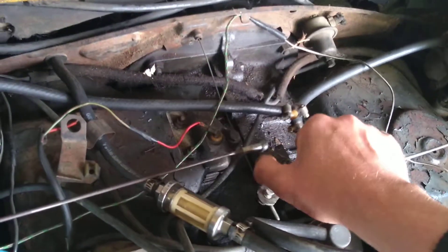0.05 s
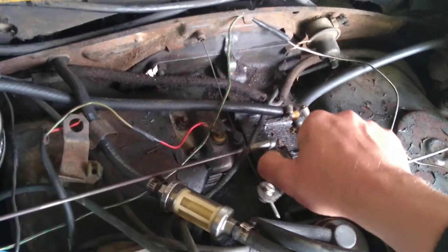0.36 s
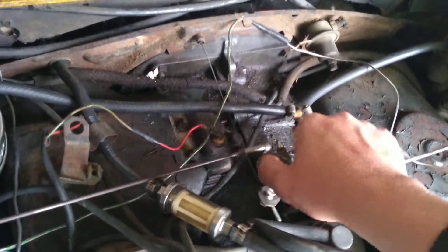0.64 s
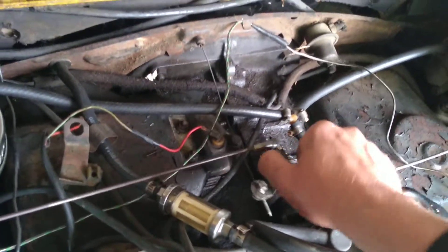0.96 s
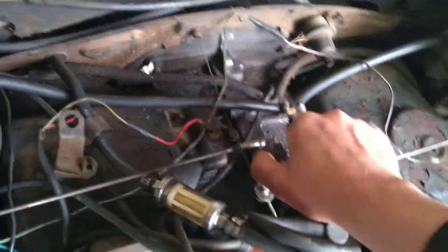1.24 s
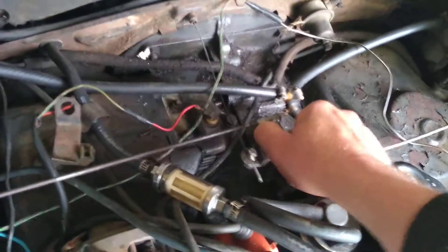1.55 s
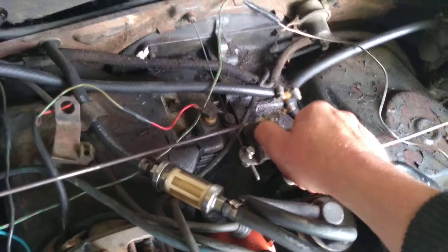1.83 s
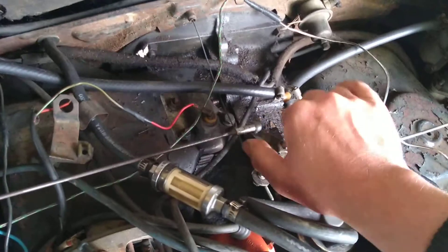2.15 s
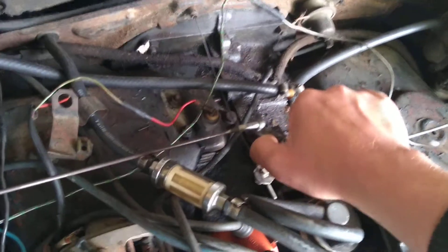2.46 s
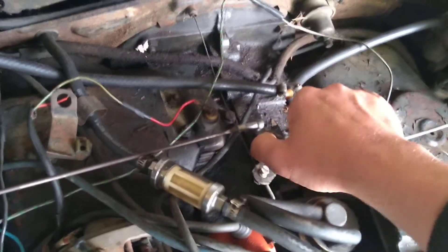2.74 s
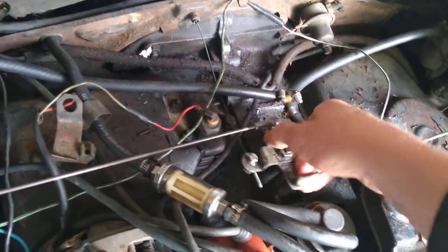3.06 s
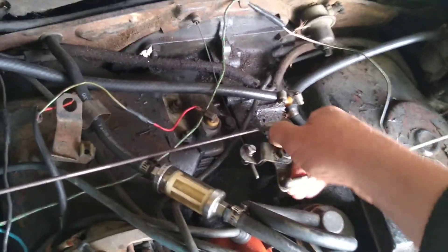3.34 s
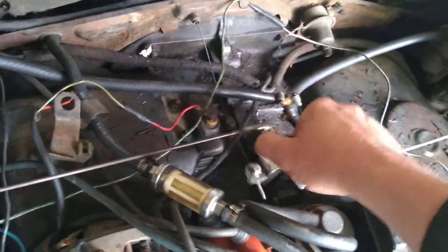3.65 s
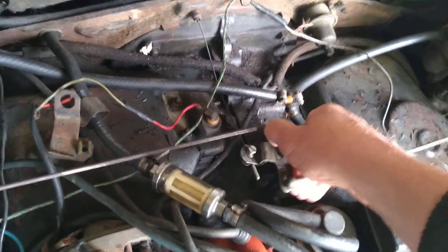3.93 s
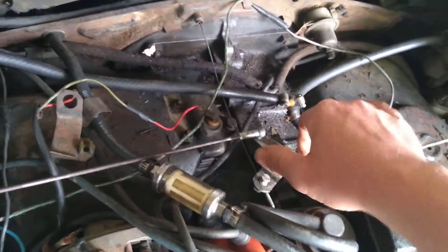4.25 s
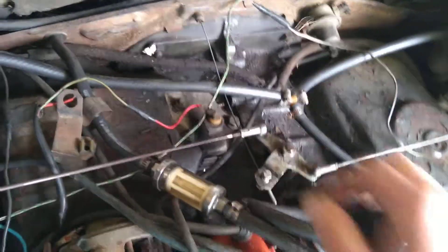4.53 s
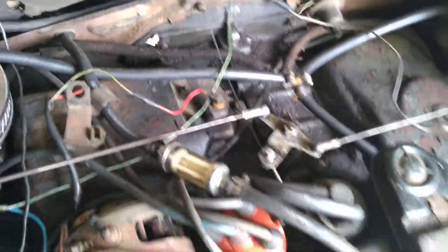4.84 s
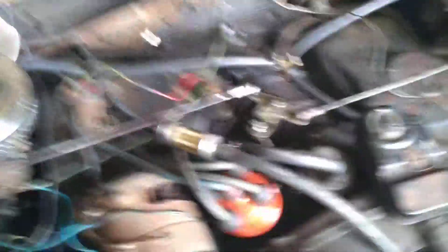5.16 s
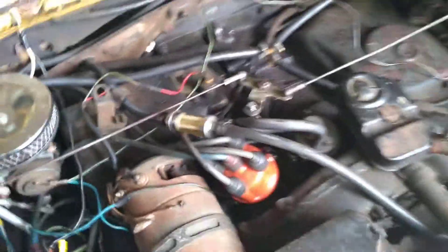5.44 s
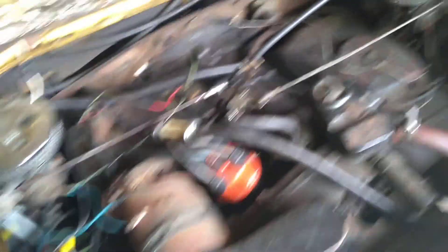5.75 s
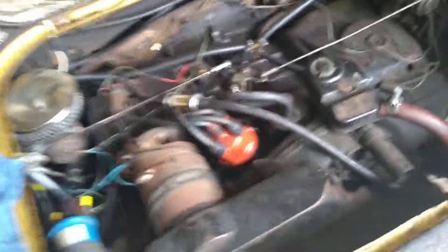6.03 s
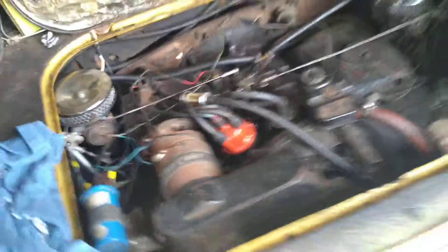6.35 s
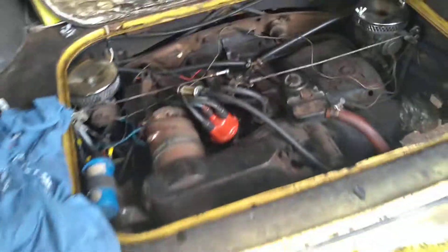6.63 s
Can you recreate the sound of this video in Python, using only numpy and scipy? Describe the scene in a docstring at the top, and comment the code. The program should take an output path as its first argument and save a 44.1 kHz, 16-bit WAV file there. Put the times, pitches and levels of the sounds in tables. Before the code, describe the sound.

An air-cooled four-cylinder car engine is already running, heard in stereo close above its open bay, with booming exhaust, clattering metal covers and rushing air. Short throttle blips come at the start, at 0.5 seconds and at 1 second, each with a hard intake bark. A longer rev climbs from 1.5 to 2.1 seconds and falls back. From about 3 seconds, three quick pulls step up to the highest, howling rev at 4.2 seconds. The throttle linkage clinks faintly now and then. The throttle shuts and the engine coasts down with a falling drone, giving a dull exhaust pop near 5 seconds. From there one cylinder knocks with a short metallic rattle, repeating and gradually slowing. From about 5.7 seconds dry, uneven valve clacks grow clearer as the engine sinks toward a slow, thumping, ticking idle, still running at about 7 seconds.

```python
"""Revving an air-cooled engine

A four-cylinder engine is revved by hand, heard by two spaced microphones above its open bay.
Each blip (a quick pull on the throttle) lets air into the intakes with a hard bark. The engine then
coasts down over its booming exhaust and clattering metal, and sinks to a slow, ticking idle
in which one cylinder knocks once a cycle."""
import sys
import numpy as np
from scipy import signal
from scipy.fft import rfft, irfft, next_fast_len
from scipy.io import wavfile
from scipy.ndimage import uniform_filter1d

SR = 44100
rng = np.random.default_rng(int(sys.argv[2]) if len(sys.argv) > 2 else 0)


def generate_wav(signal):
    """Clip the signal to [-1, 1] and save it as 16-bit WAV at the path in sys.argv[1]."""
    frames = np.transpose(np.atleast_2d(signal))
    scaled = np.clip(frames, -1, 1) * 32767
    pcm = np.round(scaled).astype(np.int16)
    wavfile.write(sys.argv[1], SR, pcm)


N = 303868
T = np.arange(N) / SR
CRUISE_HZ = 75  # engine speed is counted in firings per second, two per turn of the crank

# pulls on the throttle: open_s, shut_s, start_speed_hz, top_speed_hz, bark_db, gasp_db, attack_s, release_s
BLIPS = [(-0.1, 0.06, 68.7, 73.26, -20.5, 10, 0.048, 0.058),
         (0.466, 0.758, 49.4, 73.3, -16.5, 6.5, 0.13, 0.1),
         (0.95, 1.119, 60.81, 75.95, -20.5, 10.5, 0.048, 0.059),
         (1.54, 2.12, 51.27, 106.8, -18, 6, 0.065, 0.064),
         (2.95, 3.135, 51.93, 67.39, -15.5, -3.5, 0.024, 0.027),
         (3.21, 3.549, 68.09, 111.7, -17.5, 3, 0.023, 0.049),
         (3.76, 4.18, 98.94, 148.1, -18.5, 2.5, 0.032, 0.045)]
# blows of the knocking cylinder, led by the sharp crack of the exhaust pop: start_s, level_db
KNOCKS = [(4.946, -11.5), (5.274, -11), (5.401, -12), (5.471, -12), (5.547, -7.5), (5.627, -9),
          (5.71, -9.5), (5.798, -8), (5.889, -7), (5.986, -8), (6.087, -7), (6.193, -6.5), (6.302, -9),
          (6.416, -8.5), (6.534, -10), (6.654, -9), (6.778, -8)]
# the cylinders in firing order: boom_db, bark_db, clatter_db, hiss_db, tick_db
CYLINDERS = [(0, 0, -5, -3, 8), (0, 1.5, -6.5, -3.5, 5.5), (1.5, -1, -5, -2, 11.5), (2.5, 0.5, -6.5, -3, 8)]
# the mix as the microphones draw back: time_s, left_minus_right_db, shaking_db, tick_db, hiss_db
MIC_VIEW = [(0, -1.5, -33.5, -44, -41), (1.5, -1.5, -32.5, -47.5, -40), (2.3, -1.5, -30, -43, -37.5),
            (2.7, -1.5, -30, -45, -36.5), (4.3, -2.5, -28.5, -35, -36.5), (5.0, 0, -28.5, -40, -34.5),
            (5.7, 3.5, -26, -39.5, -42.5), (6.3, 1, -25.5, -32, -45), (6.89, -0.5, -26.5, -25.5, -49)]
# tone of small metal parts: pitch_hz, level_db
TINKLE_SPECTRUM = [(1500, -23), (4000, -16), (7000, -1), (10000, -4.5), (13500, -3), (14500, 9)]


def amp(db):
    """Turns decibels into a gain."""
    return 10 ** (np.asarray(db) / 20)


def unit_level(x):
    """Scales a signal to an average power of one."""
    return x / np.sqrt(np.mean(x ** 2) + 1e-20)


def mic_view(column):
    """One column of MIC_VIEW, at every sample."""
    rows = np.array(MIC_VIEW, float)
    return np.interp(T, rows[:, 0], rows[:, column])


def level_at(spectrum, hz):
    """Looks up a spectrum's decibels at any pitch."""
    pitches, levels = np.transpose(spectrum)
    return np.interp(np.log(hz + 1), np.log(pitches + 1), levels)


def wander(per_s):
    """A smooth random wobble of size about one."""
    points = rng.standard_normal(int(N / SR * per_s) + 2)
    fine = signal.resample(points, 8 * len(points))
    return unit_level(np.interp(T, np.linspace(0, T[-1], len(fine)), fine))


def colour(x, spectrum, size=4096):
    """Gives a sound a spectrum, with a filter that rings only after each hit."""
    log_gain = np.log(amp(level_at(spectrum, abs(np.fft.fftfreq(size, 1 / SR)))))
    taps = np.fft.ifft(np.exp(np.conj(signal.hilbert(log_gain)))).real
    return signal.oaconvolve(x, taps[None], axes=1)[:, :N]


def add(mix, start_s, sound):
    """Lays a sound into the mix at a given time."""
    part = mix[round(start_s * SR):][:len(sound)]
    part += sound[:len(part)]


def bursts(rows, rise_s, decay_s):
    """A loudness curve of quick bursts, from rows of start_s, level_db."""
    ages = ((np.maximum(T - start_s, 0), db) for start_s, db in rows)
    return sum(amp(db) * (1 - np.exp(-age / rise_s)) * np.exp(-age / decay_s) for age, db in ages)


def engine_bay(x, echo_s, echo_db, size=8192):
    """Adds dense echoes that fall 60 dB in echo_s; the two microphones hear the treble least alike."""
    # sound scattered differently to each microphone: pitch_hz, level_db
    scatter_spectrum = [(50, -2), (130, -4), (300, -3.5), (550, -8), (1100, 4), (3000, 15), (14000, 18.5)]
    t, hz = np.arange(size) / SR, np.fft.rfftfreq(size, 1 / SR)
    tails = rng.standard_normal((3, size)) * amp(-60 * t / echo_s)
    tails = rfft(tails / np.linalg.norm(tails, axis=1, keepdims=True))
    shared = (1 + amp(echo_db) * tails[0]) / np.hypot(1, amp(echo_db))
    scatter = amp(level_at(scatter_spectrum, hz))
    paths = irfft((shared + scatter * tails[1:]) / np.hypot(1, scatter))
    return signal.oaconvolve(x[None], paths[:, :size // 2], axes=1)[:, :N]


def bay_noise(spectrum, echo_s, echo_db):
    """Steady noise with a given spectrum, echoing in the bay."""
    return unit_level(colour(engine_bay(rng.standard_normal(N), echo_s, echo_db), spectrum))


def engine_speed(idle_hz=28.7, drag_hz_per_s=90.7, drag_range_hz=56.3, sag_hz=2.6, ease=.023):
    """Firings per second: climbs with each blip, coasts between them, and at last settles toward idle."""
    blips = np.array(BLIPS)
    speed = np.interp(T, blips[:, :2].ravel(), blips[:, 2:4].ravel())
    for open_s, shut_s, start_hz, top_hz, *_ in BLIPS:
        progress = np.clip((T - open_s) / (shut_s - open_s), 0, 1)
        speed -= ease * (top_hz - start_hz) * np.sin(2 * np.pi * progress)
    # after the last blip the speed sags, then falls under a drag that fades near idle
    _, shut_s, _, top_hz, *_ = BLIPS[-1]
    fade = np.exp(-(T - shut_s) * drag_hz_per_s / drag_range_hz)
    excess = np.sinh((top_hz - sag_hz - idle_hz) / drag_range_hz)
    return np.where(T > shut_s, idle_hz + drag_range_hz * np.arcsinh(excess * fade), speed)


def firing_count():
    """Firings so far, nudged so that every knock falls on the first cylinder."""
    count = np.cumsum(engine_speed()) / SR
    knock_s = np.array(KNOCKS)[:, 0]
    nudge = np.unwrap(-np.interp(knock_s, T, count), period=len(CYLINDERS))
    return count + np.interp(T, knock_s, nudge)


def revs():
    """Octaves (doublings) of engine speed above cruising."""
    return np.log2(engine_speed() / CRUISE_HZ)


def idling():
    """How far the engine has sunk into slow, separate beats, 0-1."""
    return np.clip(-revs(), 0, 1)


def opening(open_s, shut_s, attack_s, release_s, lead_s=0.015, run_on_s=0.028):
    """The throttle plate in one blip, 0-1: it opens just before the speed climbs and shuts just after."""
    return np.clip(np.minimum((T - open_s + lead_s) / attack_s, (shut_s + run_on_s - T) / release_s), 0, 1)


def airflow(gasp_share=1, gasp_s=0.086, db_per_octave=3.5):
    """Strength of the intake sound: zero with the throttle shut, most often with a gasp as it opens."""
    flow = 0
    for open_s, shut_s, _, _, bark_db, gasp_db, attack_s, release_s in BLIPS:
        gasp = gasp_share * np.exp(-abs(T - open_s) / gasp_s)
        flow += opening(open_s, shut_s, attack_s, release_s) * amp(bark_db + gasp * gasp_db)
    return flow * amp(db_per_octave * revs())


def load(switch_s=0.043):
    """How hard the engine pulls, 0-1: any blip soon puts it under load."""
    return sum(opening(open_s, shut_s, switch_s, switch_s) for open_s, shut_s, *_ in BLIPS)


def starved(lasts_s=0.31):
    """How starved the cylinders are just after the throttle snaps shut, 0-1."""
    just_shut = sum((T > shut_s) * np.exp(-((T - shut_s) / lasts_s) ** 4) for _, shut_s, *_ in BLIPS)
    return np.minimum(just_shut, 1) * (1 - load()) * np.clip(.5 + revs(), 0, 1)


def shaking_db(db_per_octave=5):
    """Level of the engine's vibration, which grows with speed."""
    return mic_view(2) + db_per_octave * revs()


def strokes(count, cylinder_db, noise_share, rise_s, decay_s, fill, uneven_db, echo_s, echo_db):
    """Each firing gives a sharp pulse and a dying puff of noise; each cylinder has its own echoes."""
    firing = np.floor(count).astype(int)
    cylinder = firing % len(CYLINDERS)
    firing -= firing.min()
    speed = engine_speed()
    age = count % 1 / speed
    strength = amp(cylinder_db[cylinder] + uneven_db * rng.standard_normal(N)[firing])
    pulse = unit_level(np.diff(firing, prepend=firing[0]) / np.sqrt(speed))
    # the faster the engine, the more the gaps between firings fill in
    puff = fill * (speed / CRUISE_HZ) ** 0.18 + (1 - np.exp(-age / rise_s)) * np.exp(-age / decay_s)
    puff /= np.sqrt(uniform_filter1d(puff ** 2, size=4096))
    noise = puff * rng.standard_normal(N)
    noise_share = np.clip(noise_share, 0, 1)
    blows = strength * (np.sqrt(1 - noise_share) * pulse + np.sqrt(noise_share) * noise)
    return sum(engine_bay(blows * (cylinder == k), echo_s, echo_db) for k in range(len(CYLINDERS)))


def engine_tones(count, tones, resonances, waver, left_lag_rad, sway_rad, flutter_db):
    """Tones at multiples of the firing rate sweep through fixed resonances, each fluttering on its own."""
    speed, out, power = engine_speed(), 0, 0
    count = count + waver * wander(40)
    for multiple, db in tones:
        height = amp(db + level_at(resonances, multiple * speed))
        phase = 2 * np.pi * (multiple * count + rng.random())
        flutter = amp(flutter_db * wander(70))
        left_phase = phase - left_lag_rad - sway_rad * wander(6)
        out += height * flutter * np.cos([left_phase, phase])
        power += height ** 2 / 2
    return out / np.sqrt(power)


def cooling_fan(level_db=-44, db_per_octave=5):
    """The fan's even rush grows louder with speed."""
    # tone of the fan's air: pitch_hz, level_db
    spectrum = [(500, -13), (1400, 24), (2000, -14), (3500, 6), (7000, 10.5), (10000, -4), (14500, -8)]
    return unit_level(colour(rng.standard_normal((2, N)), spectrum)) * amp(level_db + db_per_octave * revs())


def loose_metal(count, ticks_per_s=45, level_db=-44, db_per_octave=-2):
    """Loose clips and rods tick at random just after a firing jolts them, loudest at idle."""
    chance = 5 * (1 - count % 1) ** 4 * ticks_per_s / SR
    ticks = engine_bay((rng.random(N) < chance).astype(float), echo_s=0.032, echo_db=10)
    return unit_level(colour(ticks, TINKLE_SPECTRUM)) * amp(level_db + db_per_octave * revs())


def linkage_clinks():
    """The slack throttle linkage clinks as it is pulled, or as the engine shakes it."""
    # bright clinks: start_s, level_db
    clinks = [(1.547, -25), (2.991, -27), (3.21, -19), (5.198, -27), (5.323, -27), (5.712, -25),
              (6.55, -28)]
    return bursts(clinks, rise_s=0.0003, decay_s=0.0022) * bay_noise(TINKLE_SPECTRUM, echo_s=0.015, echo_db=0)


def air_hiss(count, waver_db=0.64):
    """Air rushes past the throttle plates and cooling fins, surging with each stroke."""
    # tone of the rushing air: pitch_hz, level_db
    spectrum = [(400, -34), (1500, -20), (2400, -6.5), (3000, 8.5), (3700, 7), (4700, 6.5), (5400, 2.5),
                (6700, 4.5), (9000, -1.5), (12000, -2.5), (14500, -34)]
    # brief rasps of air rushing in: start_s, level_db
    rasps = [(0.497, -27), (0.65, -39), (1.58, -26), (1.88, -30), (3.238, -25)]
    surges = strokes(count - .1, np.array(CYLINDERS)[:, 3], noise_share=0.88, rise_s=0.0016,
                     decay_s=0.012, fill=0.36, uneven_db=2.5, echo_s=0.065, echo_db=-13)
    background = amp(mic_view(4) - 1.5 * revs())
    inrush = amp(-17 + 2.5 * revs()) * airflow(gasp_share=.75) + bursts(rasps, rise_s=.002, decay_s=0.014)
    return unit_level(colour(surges, spectrum)) * np.hypot(background, inrush) * amp(waver_db * wander(33))


def valve_ticks(count, db_per_octave=5):
    """Tappets, the parts that push the valves open, click against their rockers, harder with speed."""
    # tone of a click: pitch_hz, level_db
    spectrum = [(300, -54), (1150, -21.5), (1500, 17), (1950, 13.5), (2400, 20.5), (3000, 12), (3550, 8.5),
                (4100, 14.5), (4700, 0), (5500, 10), (9000, -6), (14500, -41)]
    clicks = strokes(count, np.array(CYLINDERS)[:, 4], noise_share=0.94, rise_s=0.0015,
                     decay_s=0.0037, fill=0.022, uneven_db=1.5, echo_s=0.1, echo_db=9)
    return unit_level(colour(clicks, spectrum)) * amp(mic_view(3) + db_per_octave * revs())


def tappet_clacks(clack_db=-2, snap_db=-1, snap_spread_db=3.0, rise_s=.001, decay_s=.005):
    """At idle the tappets stand out as dry, uneven clacks, each with a bright snap of steel."""
    # tappet hits: start_s, clack_db, snap_db
    hits = [(5.712, -29, -38), (5.756, -36, -35), (5.891, -27, -28), (5.939, -35, -32), (5.988, -39, -26),
            (6.036, -33, -31), (6.089, -33, -23), (6.14, -25, -29), (6.194, -30, -28), (6.247, -37, -31),
            (6.303, -30, -29), (6.359, -24, -27), (6.389, -23, -30), (6.42, -24, -27), (6.478, -27, -29),
            (6.506, -29, -38), (6.535, -22, -31), (6.593, -23, -32), (6.626, -23, -29), (6.656, -20, -37),
            (6.688, -30, -36), (6.716, -19, -35), (6.749, -20, -30), (6.781, -14.5, -29), (6.811, -25, -35),
            (6.838, -16, -34), (6.871, -19, -33)]
    # tone of the clack: pitch_hz, level_db
    clack_spectrum = [(300, -30), (1100, -19), (1480, 3), (1900, -10), (2500, -6), (3000, 0), (3600, -9.5),
                      (4300, -7), (5500, -19), (9000, -30), (14500, -45)]
    # tone of the snap: pitch_hz, level_db
    snap_spectrum = [(800, -19), (3000, -4), (5200, -3), (7000, -5.5), (9000, 2), (13500, -4.5)]
    hits = np.array(hits)
    clack = bursts(hits[:, :2], rise_s, decay_s) * bay_noise(clack_spectrum, echo_s=0.019, echo_db=-3)
    snap = bursts(hits[:, ::2], rise_s, decay_s) * bay_noise(snap_spectrum, echo_s=0.019, echo_db=-3)
    return amp(clack_db) * clack + amp(snap_db + snap_spread_db * wander(20)) * snap


def block_thumps(count, level_db=-15, pitch_hz=135, rise_s=0.0021, decay_s=0.0035, late_s=.003):
    """At low speed each firing rocks the engine block with one round, short thump."""
    firing = np.floor(count).astype(int) - int(np.floor(count.min()))
    age = np.maximum(count % 1 / engine_speed() - late_s * rng.random(N)[firing], 0)
    swing = -np.sin(2 * np.pi * pitch_hz * age) * (1 - np.exp(-age / rise_s)) * np.exp(-age / decay_s)
    uneven_db = 2 * rng.standard_normal(N)[firing]
    return swing * idling() * amp(level_db + uneven_db) * amp([[-1], [0]])  # softer on the left


def case_rumble(count, level_db=2.5, starved_db=-6, coast_db=-2, idle_db=-3):
    """Every firing shakes the case around the crank: a ragged rumble, strongest under load."""
    # tone of the shaken case: pitch_hz, level_db
    spectrum = [(30, -37), (90, -10.5), (150, 5.5), (195, 4), (225, -6.5), (280, 1.5), (360, 0), (460, 2.5),
                (540, -6), (700, -15.5), (1500, -45)]
    blows = strokes(count, np.zeros(len(CYLINDERS)), noise_share=0.7 + 0.38 * revs(), rise_s=0.00088,
                    decay_s=0.0031, fill=0.43, uneven_db=0, echo_s=0.07, echo_db=-6)
    effort_db = starved_db * starved() + coast_db * (0.5 - load()) + idle_db * idling()
    return unit_level(colour(blows, spectrum)) * amp(shaking_db() + level_db + effort_db)


def case_drone(count, level_db=-10, load_db=-9, starved_db=-5, db_per_octave=28):
    """The spinning crank makes the case sing at high speed, most of all while it coasts."""
    # tones of the case: multiple_of_firing_rate, level_db
    tones = [(1.5, 5), (2.5, -14), (3, -1), (3.5, -13), (4, 0), (4.5, -6), (5, -9), (5.5, -9), (6.5, -4),
             (7.5, -7)]
    # resonances of the case: pitch_hz, level_db
    resonances = [(100, -16), (135, -8), (165, 4.5), (200, 3.5), (250, -23), (310, 8.5), (340, 8),
                  (385, 0.5), (450, 5.5), (540, 1.5), (760, 5.5), (900, 7), (1300, -3)]
    drone = engine_tones(count, tones, resonances, waver=0.0083, left_lag_rad=0.31, sway_rad=0.24,
                         flutter_db=0.5)
    speed_db = db_per_octave * np.minimum(revs(), .7)
    return drone * amp(mic_view(2) + level_db + speed_db + load_db * load() + starved_db * starved())


def cover_clatter(count, level_db=1.5):
    """Every firing shakes the sheet-metal covers; with speed the blows run together."""
    # tone of the covers: pitch_hz, level_db
    spectrum = [(100, -10.5), (300, -15), (450, 2.5), (530, -2), (620, 0.5), (760, 1), (900, 2),
                (1030, 0.5), (1140, 0.5), (1300, -4.5), (1500, -3.5), (2300, -12.5), (5000, -25.5)]
    blows = strokes(count, np.array(CYLINDERS)[:, 2], noise_share=0.76, rise_s=0.0035,
                    decay_s=.0055, fill=amp(5 * revs()), uneven_db=-0.03, echo_s=0.09, echo_db=2)
    return unit_level(colour(blows, spectrum)) * amp(shaking_db() + level_db)


def cylinder_knocks(rise_s=0.00087, decay_s=0.0019, ring_db=-2, rattle_db=16, detune=0.021, vary_db=2):
    """Off the throttle one cylinder knocks: a short rattling blow that makes the metal ring."""
    # notes of the struck metal: pitch_hz, level_db, ring_s
    notes = [(453, -11.5, 0.09), (837, -13, 0.056), (930, -9.5, 0.062), (1056, -10.5, 0.052),
             (1406, -22, 0.09)]
    # tone of the rattle: pitch_hz, level_db
    spectrum = [(50, -27), (150, 1), (300, -4.5), (480, -13.5), (640, -3.5), (800, -7), (950, -1.5),
                (1070, -8.5), (1250, -23), (1430, -2.5), (1800, -33), (3000, -23), (6000, -24.5),
                (14000, -31.5)]
    blows, ring, age = np.zeros(N), np.zeros(N), np.arange(4096) / SR
    onset = 1 - np.exp(-age / rise_s)
    for start_s, db in KNOCKS:
        for pitch_hz, note_db, ring_s in notes:
            fade = amp(note_db + vary_db * rng.standard_normal() - 60 * age / ring_s)
            hz = pitch_hz * (1 + detune * rng.standard_normal())
            add(ring, start_s, amp(db) * onset * fade * np.sin(2 * np.pi * (hz * age + rng.random())))
        add(blows, start_s, amp(db) * onset * np.exp(-age / decay_s))
    rattle = colour(engine_bay(blows * rng.standard_normal(N), echo_s=0.029, echo_db=28), spectrum)
    return amp(ring_db) * ring + amp(rattle_db) * rattle


def exhaust_pop():
    """As the speed falls, unburnt fuel goes off in the exhaust with a dull puff."""
    # the pop: start_s, level_db
    pops = [(4.942, -18)]
    # tone of the puff: pitch_hz, level_db
    spectrum = [(40, -21), (110, 9), (250, -18), (370, 9), (450, -14), (900, -8.5), (1700, -25),
                (8000, -38)]
    return 2 * bursts(pops, rise_s=0.0012, decay_s=0.018) * bay_noise(spectrum, echo_s=0.026, echo_db=-22)


def exhaust_boom(count, level_db=0.5, flutter_db=0.63, left_db=-2, load_lag_firings=0.3):
    """The silencer, off to the right, booms at the firing rate and throbs with the uneven cylinders."""
    # exhaust tones: multiple_of_firing_rate, level_db
    tones = [(.5, -18.5), (1, 0), (1.5, -12.5), (2, -8), (2.5, -17), (3, -9.5), (4, -14), (5, -11)]
    # tone of the silencer: pitch_hz, level_db
    silencer = [(20, -51), (38, -56), (50, -10), (58, -1.5), (68, 4), (95, -5), (150, -5.5), (220, -8.5),
                (400, -4.5), (800, -53)]
    # how the exhaust resonates at each speed: speed_hz, coasting_db, loaded_db
    levels = [(33.2, -30, -32), (42.4, -26.5, -32), (51.7, -34.5, -30.5), (66, -23.5, -20.5),
              (82.6, -27.5, -20), (93, -28, -24.5), (105, -27, -22), (126, -20, -19), (145, -24.5, -27)]
    speed, pull, levels = engine_speed(), load(), np.array(levels)
    throb_db = np.interp(count, np.arange(len(CYLINDERS)), np.array(CYLINDERS)[:, 0], period=len(CYLINDERS))
    coasting, loaded = amp(level_at(levels[:, :2], speed)), amp(level_at(levels[:, ::2], speed))
    # pulses come later under load, so the boom dips as the load changes
    blend = (1 - pull) * coasting + pull * loaded * np.exp(-2j * np.pi * load_lag_firings)
    delayed_count = count + np.unwrap(np.angle(blend)) / (2 * np.pi)
    lag = np.interp(speed, [35, 65, 120], [.5, 1.1, 1.3])
    boom = engine_tones(delayed_count, tones, silencer, waver=.007, left_lag_rad=lag, sway_rad=.3,
                        flutter_db=.7)
    return boom * abs(blend) * amp(level_db + throb_db + flutter_db * wander(25)) * amp([[left_db], [0]])


def intake_bark(count, bark_db=-3, gulp_db=-11, gulp_db_per_octave=-10):
    """With the throttle open each breath of air barks: a deep gulp at low speed, a howl at high speed."""
    # tone of the bark: pitch_hz, level_db
    bark_spectrum = [(30, -66), (70, 8.5), (125, -6.5), (205, 2.5), (255, -5), (305, 5), (420, 2), (490, 0),
                     (550, -2.5), (620, 1), (730, -8), (960, -7), (1040, -9.5), (1150, -4.5), (1300, -9),
                     (1700, -12.5), (3000, -21.5), (8000, -37)]
    # tone of the gulp: pitch_hz, level_db
    gulp_spectrum = [(40, -71), (85, 8), (115, 5), (160, 6), (210, 6.5), (250, -3.5), (305, 2), (500, -6),
                     (1000, -38.5)]
    # tones of the howl: multiple_of_firing_rate, level_db
    tones = [(1.5, -6), (2, 1), (2.5, -1), (3, 1), (3.5, -1), (4, -6), (4.5, -3), (5, -6), (5.5, -9)]
    # resonances of the intake pipes: pitch_hz, level_db
    pipes = [(120, -4), (200, 2.5), (250, -2.5), (300, 3), (350, 4.5), (420, 4.5), (490, 3), (550, 1),
             (650, 2.5), (1000, -13)]
    # the howl builds as the pipes come into resonance: speed_hz, level_db
    howl_levels = [(55, -16), (80, -9), (100, 0), (112, 0), (128, -1.5), (145, 0)]
    breaths = strokes(count - .3, np.array(CYLINDERS)[:, 1], noise_share=0.62, rise_s=0.00058,
                      decay_s=0.0056, fill=0.45, uneven_db=-1, echo_s=0.047, echo_db=-9.5)
    bark = unit_level(colour(breaths, bark_spectrum)) * amp(bark_db)
    gulp = unit_level(colour(breaths, gulp_spectrum)) * amp(gulp_db + gulp_db_per_octave * revs())
    howl = engine_tones(count, tones, pipes, waver=0.019, left_lag_rad=1, sway_rad=1, flutter_db=2)
    howl *= amp(level_at(howl_levels, engine_speed()))
    return (bark + gulp + howl) * airflow()


def scene():
    """Machinery, exhaust and air, all following one crankshaft."""
    count = firing_count()
    body = case_rumble(count) + block_thumps(count) + cover_clatter(count) + case_drone(count)
    taps = valve_ticks(count) + tappet_clacks() + cylinder_knocks() + loose_metal(count)
    exhaust = exhaust_boom(count) + exhaust_pop()
    air = intake_bark(count) + air_hiss(count) + cooling_fan()
    return body + taps + exhaust + air + linkage_clinks()


def record(dry, spacing_s=.000483, ceiling=.95, top_hz=14300):
    """Two microphones turn as they draw back; the stereo is widened and the highest peaks are rounded."""
    # balance between the microphones: pitch_hz, left_minus_right_db
    balance = [(60, 2), (300, 1), (600, 1), (2000, -1), (4500, 2), (7000, -1.5), (13000, -3.5)]
    # how much of the other channel each one subtracts: pitch_hz, level_db
    crossfeed = [(50, -68), (300, -70), (600, -10.5), (1000, -2), (2100, -2.5), (3100, -6), (4200, -3.5),
                 (6200, -9.5), (8300, -13.5), (14000, -29)]
    size = next_fast_len(N)
    sides, hz = np.array([[.5], [-.5]]), np.fft.rfftfreq(size, 1 / SR)
    mics = rfft(dry * amp(sides * mic_view(1)), size) * amp(sides * level_at(balance, hz))
    feed = amp(np.minimum(level_at(crossfeed, hz), 0))
    other_delayed = np.exp(-2j * np.pi * hz * spacing_s) * mics[::-1]
    wide = irfft((mics - feed * other_delayed) / np.hypot(1, feed), size)[:, :N]
    rounded = wide / (1 + (wide / ceiling) ** 6) ** (1 / 6)
    treble_cut = signal.firwin(511, top_hz, window=("kaiser", 9), fs=SR)
    return signal.oaconvolve(rounded, treble_cut[None], "same")


dry = scene()
out = record(dry)
generate_wav(out)
```